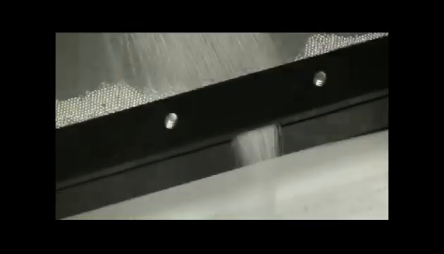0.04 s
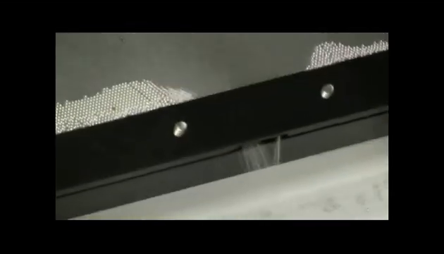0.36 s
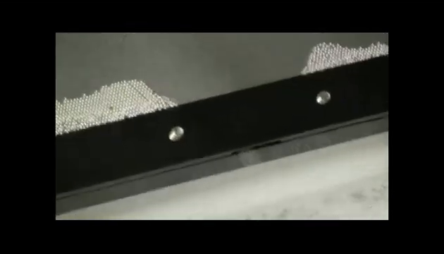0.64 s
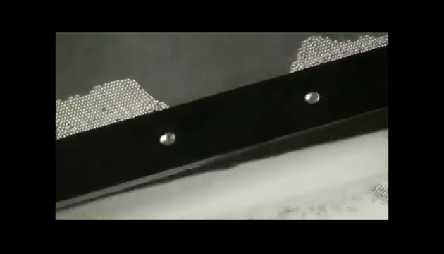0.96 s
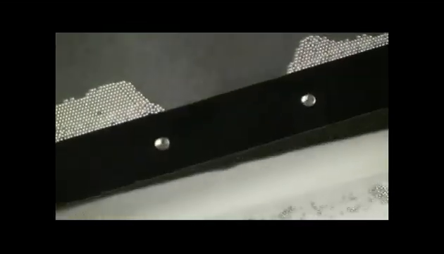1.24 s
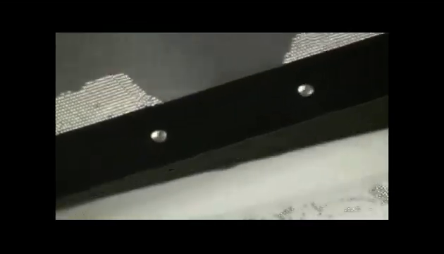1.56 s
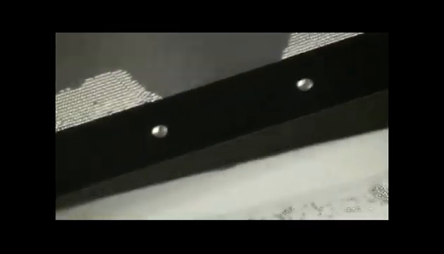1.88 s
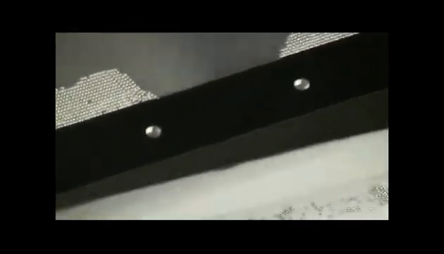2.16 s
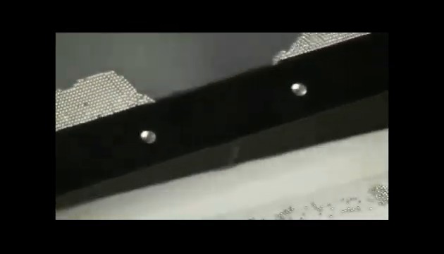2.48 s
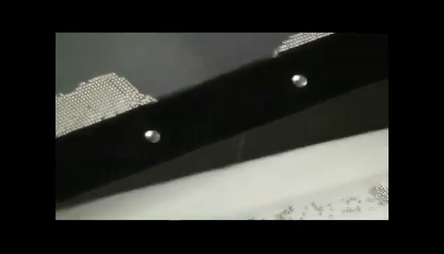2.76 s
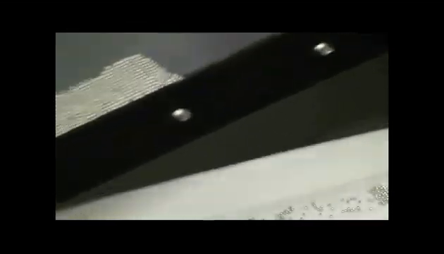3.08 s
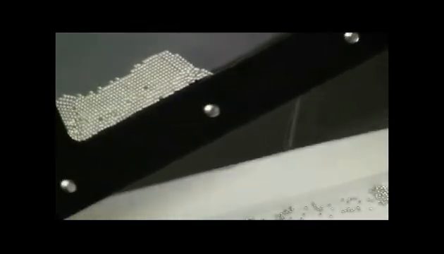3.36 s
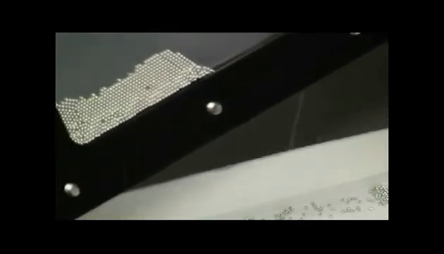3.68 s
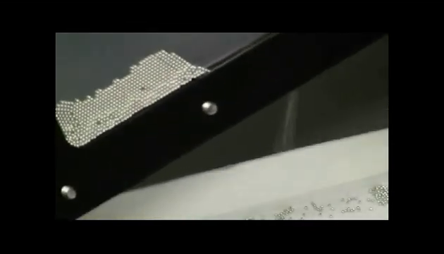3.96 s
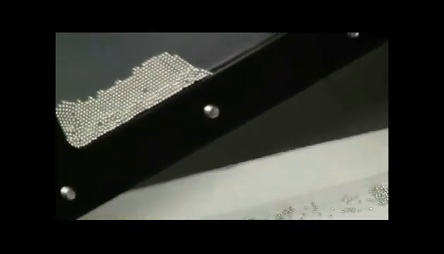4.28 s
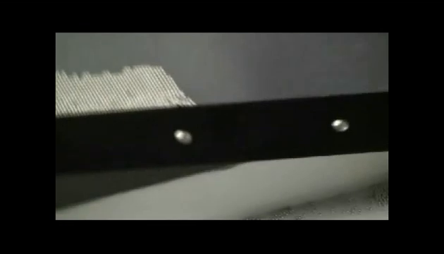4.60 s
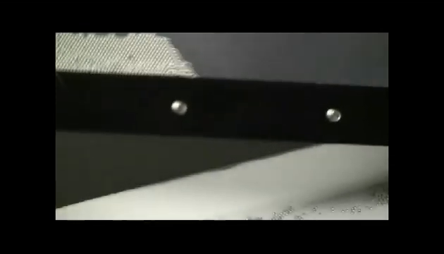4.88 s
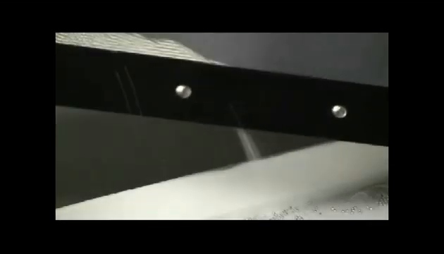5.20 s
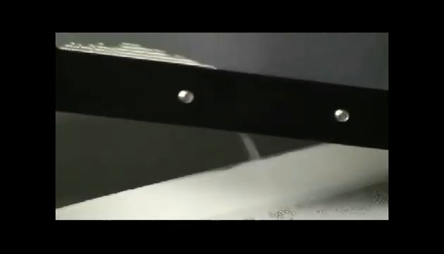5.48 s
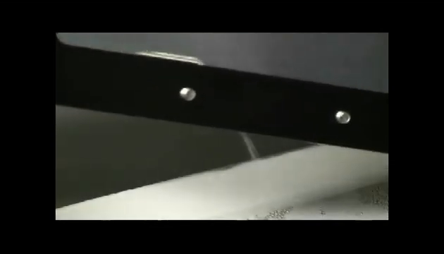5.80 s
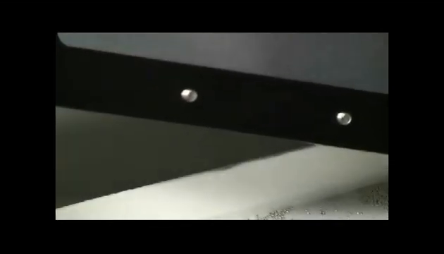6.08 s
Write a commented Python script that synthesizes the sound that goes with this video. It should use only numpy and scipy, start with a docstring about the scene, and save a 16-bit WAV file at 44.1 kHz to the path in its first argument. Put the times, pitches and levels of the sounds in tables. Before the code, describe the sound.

A sandy hiss of small metal beads falling into a ringing tray swells and fades, broken by scattered clicks, while a fan hums.

```python
"""Tiny metal balls roll off a tilted plate and fall into a tray on a workbench.
They come in three surges and a thin trickle, with stray balls and small clumps in between.
Each landing is a very short crack that rings the tray and comes back off nearby surfaces and
the room. Thousands a second merge into a sandy hiss. A fan drones behind it all."""
import sys
import numpy as np
from scipy import signal
from scipy.fft import rfft, irfft, next_fast_len
from scipy.io import wavfile

SR = 44100
rng = np.random.default_rng(int(sys.argv[2]) if len(sys.argv) > 2 else 0)


def wav_record(signal):
    """Record a signal, one row per channel, as 16-bit PCM in the file named by sys.argv[1]."""
    frames = np.transpose(np.atleast_2d(signal))
    bounded = np.clip(frames, -1, 1)
    # unit amplitude maps onto the largest positive 16-bit level
    quanta = np.round(bounded * 32767).astype(np.int16)
    wavfile.write(sys.argv[1], SR, quanta)


N = 275303
TIME = np.arange(N) / SR


def undb(db):
    """Turn decibels into a number to multiply by."""
    return 10 ** (np.asarray(db) / 20)


def level(x, db):
    """Set a sound's average (rms) level."""
    return x * undb(db) / np.sqrt(np.mean(x ** 2))


def colour(x, points):
    """Turn lows and highs up or down along a curve of (f/Hz, gain/dB) points."""
    hz, db = np.transpose(points)
    size = next_fast_len(x.shape[-1] + SR // 20)
    freq = np.maximum(np.fft.rfftfreq(size, 1 / SR), 1)
    gain = undb(np.interp(np.log(freq), np.log(hz), db))
    return irfft(rfft(x, size) * gain, size)[..., :x.shape[-1]]


def ring(x, notes):
    """An object shaken by x rings at its own notes: (f/Hz, width/Hz, gain/dB)."""
    return sum(undb(db) * signal.lfilter(*signal.iirpeak(hz, hz / width, fs=SR), x)
               for hz, width, db in notes)


def wander(per_s):
    """A slow random drift, roughly 1 up or down."""
    steps = rng.standard_normal(200)
    return np.interp(TIME * per_s, np.arange(len(steps)), steps)


def past(s):
    """Seconds gone by since time s; zero before it."""
    return np.maximum(TIME - s, 0)


def until(s):
    """Seconds left until time s; zero after it."""
    return np.maximum(s - TIME, 0)


def flow(start, stop, db, rise_db_per_s, fade_db_per_s):
    """Level of a run of balls: it rises to db by the start and fades after the stop."""
    return np.maximum(db - rise_db_per_s * until(start) - fade_db_per_s * past(stop), -140)


def ball_rate(db, dribble_per_s=280, full_per_s=2300, full_db=-30.5):
    """Balls per second: a thin dribble, plus more as the stream gets louder."""
    return dribble_per_s + full_per_s * undb(db - full_db) ** 2


def stream(stream_db, per_s, jitter=.4, flight_s=.025, loss_db=11.0, scatter_db=3.0, landings=5):
    """Balls leave the plate's edge one by one, land and bounce, losing strength as they go."""
    fallen = np.cumsum(per_s) / SR
    chance = rng.standard_normal((int(fallen[-1]), 1 + 2 * landings))
    first_s = np.interp(np.arange(len(chance)) + jitter * chance[:, 0], fallen, TIME)
    bounce = np.arange(landings)
    flights = flight_s * np.abs(chance[:, 1:1 + landings]) * (bounce > 0)
    when = first_s[:, None] + np.cumsum(flights, axis=1)
    strength = undb(-loss_db * bounce + scatter_db * chance[:, 1 + landings:])
    # the more balls share the level, the less each one stands out
    strength = level(strength, 0) * np.sqrt(SR / landings / np.interp(first_s, TIME, per_s))[:, None]
    blows = np.bincount((when * SR).astype(int).ravel(), strength.ravel(), N)[:N]
    return blows * undb(stream_db)


def burst(t, fade_s, rise_s=.0002):
    """A puff of noise that falls 60 dB in fade_s. Two rows: mid (centre) and side (stereo spread)."""
    since = np.maximum(t, 0)
    shape = (1 - np.exp(-since / rise_s)) * undb(-60 * since / fade_s)
    noise = rng.standard_normal((2, len(t))) * shape
    return noise / np.sqrt(np.sum(noise ** 2, axis=1, keepdims=True))


# Echoes off nearby surfaces: delay/s, level/dB
ECHOES = [(.0044, -6.5), (.011, -18)]
def impact(crack_s, echo_scatter=0.036, room_fade_s=0.18, room_db=-6.0, room_delay_s=0.004):
    """One ball lands: a crack, its echoes and the fading sound of the room."""
    t = np.arange(SR // 6) / SR
    sound = burst(t, crack_s) + undb(room_db) * burst(t - room_delay_s, room_fade_s)
    for lag, db in ECHOES:
        delay_s = lag * (1 + echo_scatter * rng.standard_normal())
        sound = sound + undb(db) * burst(t - delay_s, crack_s)
    return sound


def patter(blows, spots=14, faintest_db=-70):
    """Each blow of a stream falls on one of many spots, each with its own crack."""
    spot = rng.integers(0, spots, N)
    heard = np.flatnonzero(np.abs(blows) > undb(faintest_db))
    span = slice(heard[0], heard[-1] + SR // 6)
    cracks = np.zeros((2, N))
    for k in range(spots):
        here = blows[span] * (spot[span] == k)
        cracks[:, span] += signal.oaconvolve(here[None], impact(crack_s=0.011), axes=1)[:, :len(here)]
    return cracks


# The bright tone of a crack: f/Hz, gain/dB
CRACK_TONE = [(100, -50), (1300, -19), (2150, -14.5), (2480, -14), (2650, -12), (3000, -12.5), (3600, -8),
              (4300, -4.5), (5000, -4), (5600, -1.5), (6300, 0.5), (6950, -3), (8000, -0.5), (9000, 3.5),
              (10100, 1.5), (11200, 5), (12200, -0.5), (12800, -2), (13350, -1.5), (14100, -6.5),
              (15000, -11)]
# The tray's notes: f/Hz, width/Hz, then level/dB above the crack at four landing places
# (first surge; trickle, strays and clumps; second surge; last surge)
TRAY_NOTES = [(3080, 23, 5, 7, 4, -12.5), (3394, 35, -6, 4.5, 1, -21), (3800, 63, -3, -6, 2.5, -14),
              (4187, 115, -12, -1, 1, 5), (4400, 50, -3, -3, 6.5, 4), (4600, 50, -5, 2, -10, -12),
              (5260, 70, -1, -8, -1, 1), (5450, 40, -4, -2, -2, -1), (5880, 105, -8, -6, 1.5, 4),
              (6200, 130, -13, -9, -9, -16), (7340, 220, -7, -7, -19, -27), (9940, 99, -23, -26, -13, 0)]
def tray(cracks, place, ring_db=0, wander_db=2.2):
    """Cracks ring the tray. The landing point wanders, so each note comes and goes."""
    cracks = colour(cracks, CRACK_TONE)
    notes = [(hz, width, dbs[place] + wander_db * wander(per_s=7)) for hz, width, *dbs in TRAY_NOTES]
    return cracks + undb(ring_db) * ring(cracks, notes)


# The plate's notes: f/Hz, width/Hz, gain/dB
PLATE_NOTES = [(1403, 48, 4), (1660, 90, -0.5), (1916, 140, 1), (2068, 88, 1.5)]
def rolling(gain):
    """Countless light touches of rolling balls make the plate murmur."""
    touches = colour(rng.standard_normal(N), [(600, -7), (1300, 8.5), (2150, 3.5), (2420, -6), (6000, -26)])
    return level(ring(touches, PLATE_NOTES), 0) * gain


# One pour for each tilt of the plate; row two is the trickle: start t/s, peak t/s, stop t/s,
# peak level/dB, swell/(dB/s), sag/(dB/s), rolling level/dB relative to the stream, side gain/dB
POURS = [(-0.1, 0.33, 1, -30.5, 8.5, 13.5, -19, -24), (2.587, 2.76, 5, -51, 19, 14.5, -19, 5),
         (3.51, 4.24, 4.385, -35, 16.5, 13, -19.5, -27), (5.26, 5.36, 6.15, -32.5, 10, 5, -22, -5)]
def pours(stop_drop_db=3.5, drop_s=.025, linger_s=0.13, settle_per_s=700):
    """Each pour swells, sags as the heap shrinks, and drains away. Gives mid and side."""
    mid, side, roll_gain = 0, 0, 0
    for place, (start, peak, stop, peak_db, swell, sag, roll_db, side_db) in enumerate(POURS):
        supply_db = peak_db - swell * until(peak) - sag * past(peak)
        # when the supply stops the level drops, and the last balls bounce on for a moment
        supply_db -= stop_drop_db * np.minimum(past(stop) / drop_s, 1)
        db = flow(start, stop + linger_s, supply_db, rise_db_per_s=260, fade_db_per_s=44.5)
        per_s = ball_rate(db) + settle_per_s * (TIME > stop)  # settling balls bounce thick and fast
        ring_db = -2.5 * past(peak)  # a growing bed of balls muffles the tray
        ring_db -= 22 * past(stop)  # the last bounces get too light to ring it
        landing = tray(patter(stream(db, per_s)), place, ring_db)
        mid = mid + landing[0]
        side = side + undb(side_db) * landing[1]
        roll_gain = roll_gain + undb(db + roll_db)
    return mid + rolling(roll_gain), side


# The tone of the fan's rushing air: f/Hz, gain/dB
AIR_TONE = [(25, -28), (55, -27), (85, -8.5), (130, -5), (180, -7), (245, -7), (300, 6), (450, -3.5),
            (800, 1.5), (950, -5.5), (1300, -4), (1600, -5), (2500, -11), (5000, -18.5), (14000, -28)]
# The notes in its drone: f/Hz, width/Hz, level/dB above the air
DRONE_NOTES = [(82, 21, 5), (167.8, 21.6, 8.5), (283.6, 17.6, 9.5), (322.5, 13.3, 9.5), (349.5, 17, 10.5),
               (551.6, 12.7, 17.5), (662.9, 7.8, 19.5), (805, 39, 8.5), (1020, 30, 13), (1211, 12.5, 13.5),
               (1280, 6.5, 16.5)]
def fan(db=-50.0):
    """Rushing air, and a drone that wavers as the swirling air drives it."""
    air, swirl = colour(rng.standard_normal((2, N)), AIR_TONE)
    return level(air + ring(swirl, DRONE_NOTES), db)


def blade_hum(hz=316.4, db=-54.5, drift_hz=1.16, waver_db=1.0):
    """The fan's blades hum one note that drifts a little in pitch and level."""
    drift = level(colour(rng.standard_normal(N), [(2, 0), (20, -60), (200, -120)]), 0)
    tone = np.sin(2 * np.pi * np.cumsum(hz + drift_hz * drift) / SR)
    return level(tone * undb(waver_db * wander(per_s=6)), db)


# The tone of the background hiss: f/Hz, gain/dB
HISS_TONE = [(15, -48), (25, -22), (129, -16.5), (173, -3), (293, 0.5), (616, 2), (846, -3.5), (1160, -4),
             (1600, -13), (2700, -23.5), (4600, -35), (11300, -29), (14000, -94)]
def hiss(db=-51.5):
    """Soft, dull microphone noise, separate on the left and right."""
    return level(colour(rng.standard_normal((2, N)), HISS_TONE), db)


# Stray balls, and hard hits that stand out of the trickle:
# t/s, tick level/dB, body level/dB above the tick, glassy top level/dB above the tick
STRAY_HITS = [(1.0363, -14.5, 0.5, -1.5), (1.08, -18, -12, -4), (1.104, -15, -4, -8.0),
              (1.1172, -15.5, -8, -1.0), (1.1577, -18.5, -2.0, 2.0), (1.18, -13.5, -10.0, -4),
              (1.2185, -18.5, -6.0, -7.0), (1.328, -21.0, -5, -9), (1.351, -22, -3, -5),
              (1.4307, -27.5, -0.5, -8.0), (1.479, -28, -1, -8.0), (1.5592, -36, 5, -8.0),
              (1.5926, -34, -10, -2.0), (1.6057, -18.5, -4.5, -8.0), (1.6118, -20, 0, 1),
              (1.7175, -26.5, -2.0, 2), (1.7845, -32, 0, -8.0), (1.8293, -32, -4, 0.0),
              (2.0183, -21, -3.0, -10), (2.067, -18.5, -1.0, 2), (2.137, -22.5, 0, -5.0),
              (2.1415, -17.5, -3.0, 5), (2.1507, -22.0, 1, 1.0), (2.175, -29.0, -1.0, -8.0),
              (2.2176, -18, -3.0, -6), (2.261, -20.5, -4, -10), (2.3254, -24, -10.0, 2.0),
              (2.3388, -17, -4, 1.0), (2.347, -16.5, -2, -0.0), (2.3582, -19.0, 4, -5.0),
              (2.3703, -25, -1.0, 4.0), (2.385, -20.5, -1.0, -8.0), (2.4097, -26, -2.0, -8.0),
              (2.446, -18, -8, -8.0), (2.453, -19.5, -11, -1.0), (2.4719, -19.5, -7, -2.0),
              (2.4934, -17, -5, -6.0), (2.5281, -32.0, 5, -8.0), (2.561, -24.5, -1, 1.0),
              (2.578, -28, -10.0, 1.0), (2.5895, -18, -4.0, -8.0), (2.598, -15, -4.0, -1),
              (2.605, -17, -3.0, -1), (2.6195, -17, 1, 2), (2.6537, -19, -0.0, 2.0), (2.67, -19, 2.0, 1.0),
              (2.7005, -25, 4.0, 7.0), (2.711, -15.5, -4, 1.0), (2.7185, -19, -4.0, -4.0),
              (2.7371, -13.5, -5, 6), (2.757, -20, -0.0, -8.0), (2.779, -17, -6.0, 2.0),
              (2.7923, -20, -1, -8.0), (2.806, -22, 1.0, 7.0), (2.8262, -24, -1.0, 5.0),
              (2.853, -18, -4.0, -8.0), (2.8615, -15, -4, -1), (2.901, -17.5, -2, -8.0),
              (2.9122, -16.5, -1, -1.0), (2.9827, -26.5, -6, 7.0), (3.0214, -17, 1, -8.0),
              (3.0376, -15, -4, -6.0), (3.053, -20, 0, 4.0), (3.064, -19, -4.0, -8.0), (3.07, -20, 0, -6.0),
              (3.089, -18.5, -5.0, -3.0), (3.111, -20, -2, -8.0), (3.1335, -18, -7, -8.0),
              (3.1634, -23.0, -6, -5.0), (3.1952, -24.5, -5, 0.0), (3.209, -24, -8.0, -6.0),
              (3.232, -16.5, -3, -8.0), (3.2926, -24, -6, -4), (3.3225, -26.5, -6.0, -7.0),
              (3.3493, -15, -5.0, -12), (3.374, -22, 5, -1.0), (3.3988, -22, 3.0, -7),
              (3.4164, -18.5, 3, 6.0), (3.4447, -20.5, 2, -10), (3.456, -15.5, 0, 4), (3.4662, -20.0, 5, 8),
              (3.4847, -20, 1, -3.0), (3.5095, -16.5, 1, 3.0), (3.5568, -15.5, -1, 3.0),
              (3.5682, -18.5, 3, 7), (3.5934, -14.5, 1, 9), (3.6346, -14, -2, -4), (3.6473, -12, 0.0, -8.0),
              (3.7655, -18, 0, 10), (3.811, -21, -3, 2.0), (3.8363, -28, 0.0, 4), (3.877, -33, 3.0, 9),
              (3.9016, -34, -3, -6), (3.9652, -12, -3.0, 4.0), (3.9851, -19, -5, -4.0),
              (4.648, -25, -8, 2.0), (4.737, -17, -2.5, -8.0), (4.7692, -25, 4, -5.0),
              (4.826, -17.5, -7, -8.0), (4.8353, -18, -2, 4.0), (4.8601, -21.5, -3, -8.0),
              (4.9168, -27.5, -6, -8.0), (4.9276, -31, -1.0, -6.0), (4.9454, -29, -3, 5.0),
              (4.9494, -23.5, -2, -1.0), (4.9592, -27.5, 1.0, 3), (5.0126, -25, 1, -8.0),
              (5.0244, -24, -8, -1.0), (5.0335, -32, -3.0, -0.0), (5.063, -31, 3.0, 3.0),
              (5.078, -21, -3.0, -5), (5.0856, -19.0, -4.0, 3.0), (5.095, -17.5, 1, 5),
              (5.1805, -18.5, -10.0, 3), (5.1987, -21, 1, -8.0), (5.2102, -9.5, -4, 2.0),
              (5.2188, -13, 3, 5), (5.2295, -11.5, -9.0, -8.0), (5.2433, -17, -1.0, 3.0),
              (5.2545, -11, -2, -4.0)]
def strays(body_hz=5000, tick_hz=9500, edge_hz=11800, top_hz=13400, snap_db=-2.5):
    """Single balls snap on the bare tray: some with a full knock, some with a thin, glassy tick."""
    cracks = np.zeros((2, N))
    for s, db, body_db, top_db in STRAY_HITS:
        at = int(s * SR)
        sound = impact(crack_s=0.012)
        sound[0, :2] += undb(snap_db) * np.array([1, -1]) / np.sqrt(2)  # first touch, straight ahead
        tone = [(body_hz, db + body_db), (tick_hz, db), (edge_hz, db), (top_hz, db + top_db)]
        sound = colour(sound, tone)[:, :N - at]
        cracks[:, at:at + sound.shape[1]] += sound
    return cracks


# Clumps that break loose from the heap: start t/s, length/s, level/dB
CLUMPS = [(2.344, 0.026, -52), (2.473, .03, -52), (2.604, 0.044, -46), (2.718, 0.09, -49),
          (3.03, 0.032, -57), (3.518, .08, -49), (3.677, 0.053, -44), (3.96, 0.03, -44),
          (5.089, 0.013, -52.5), (5.29, .06, -39.5)]
def clumps():
    """A small bunch of balls slips over the plate's edge together."""
    db = np.max([flow(s, s + length, clump_db, rise_db_per_s=899.5, fade_db_per_s=240)
                 for s, length, clump_db in CLUMPS], axis=0)
    return stream(db, ball_rate(db))


# Strays and clumps sound fuller than the pours: f/Hz, gain/dB
FULLER_TONE = [(2000, 7), (3100, 1.5), (5000, 0), (8000, -1), (11000, -2), (14000, -5.5)]
# High sounds spread wider between left and right: f/Hz, side gain/dB
STEREO_SPREAD = [(2000, -20), (4500, -20), (6000, -15), (8000, -9.5), (12000, -7.5)]
def balls(tick_side_db=-3):
    """Pours, strays and clumps land in the same tray, straight ahead. Gives left and right."""
    mid, side = pours()
    ticks = colour(tray(strays() + patter(clumps()), place=1), FULLER_TONE)
    mid = mid + ticks[0]
    side = colour(side + undb(tick_side_db) * ticks[1], STEREO_SPREAD)
    return np.array([mid + side, mid - side])


def scene():
    """The balls over the steady background of the workshop."""
    return balls() + fan() + blade_hum() + hiss()


def record(dry, top_hz=15200):
    """Cut away the very highest treble."""
    return signal.sosfilt(signal.ellip(10, .2, 80, top_hz, fs=SR, output="sos"), dry)


dry = scene()
out = record(dry)
wav_record(out)
```